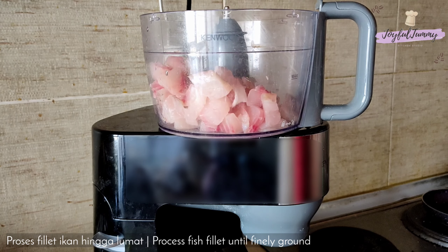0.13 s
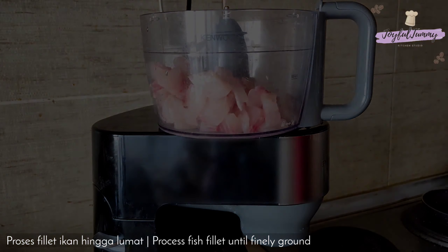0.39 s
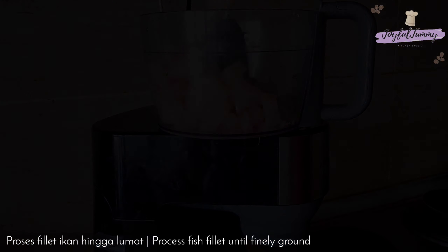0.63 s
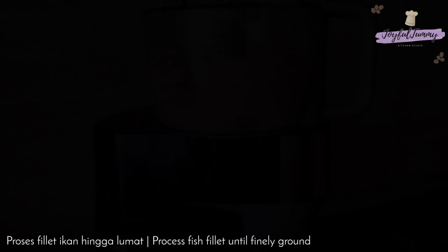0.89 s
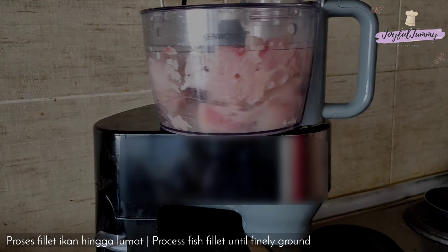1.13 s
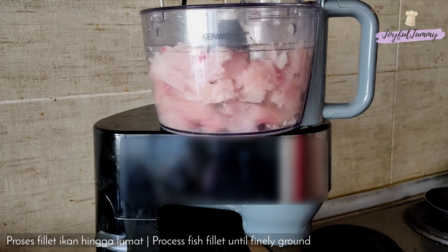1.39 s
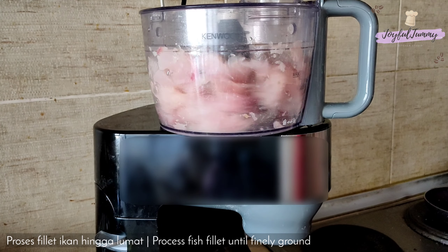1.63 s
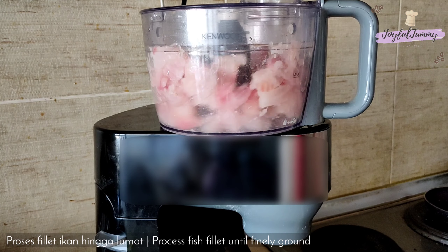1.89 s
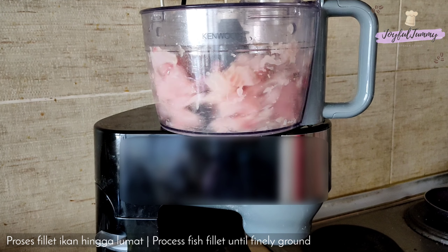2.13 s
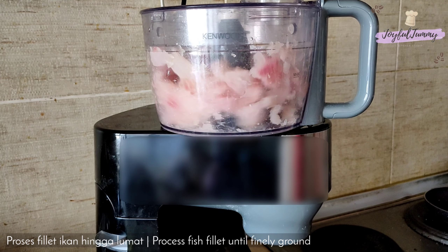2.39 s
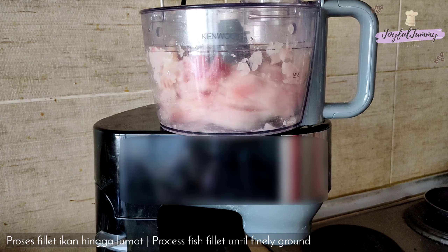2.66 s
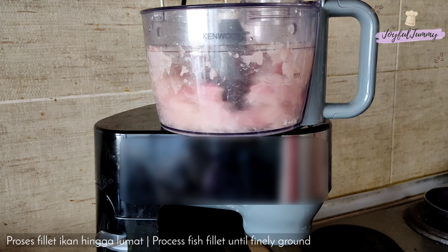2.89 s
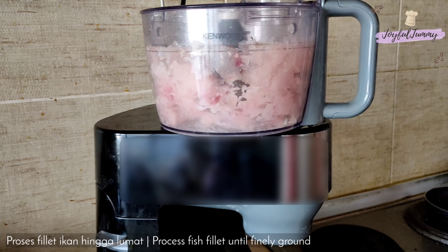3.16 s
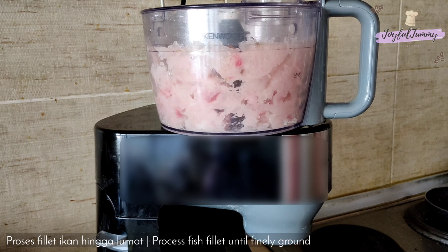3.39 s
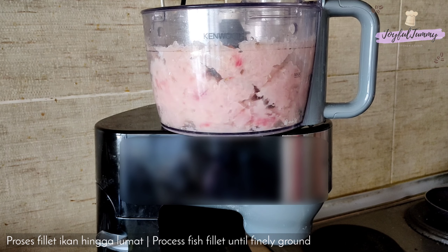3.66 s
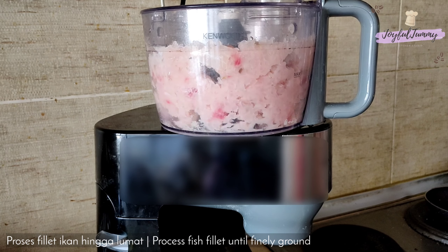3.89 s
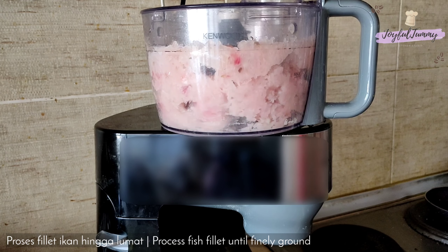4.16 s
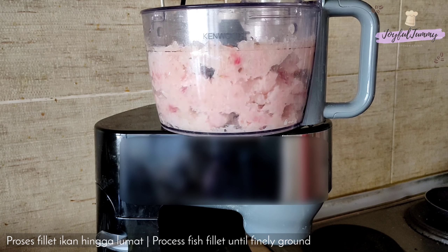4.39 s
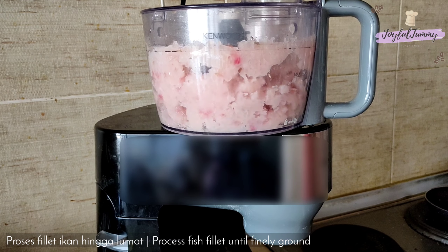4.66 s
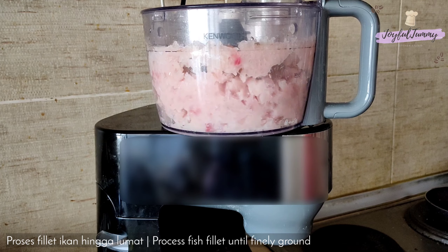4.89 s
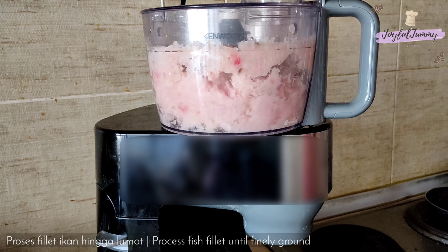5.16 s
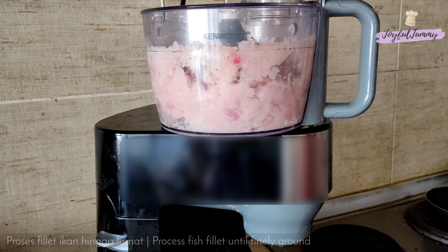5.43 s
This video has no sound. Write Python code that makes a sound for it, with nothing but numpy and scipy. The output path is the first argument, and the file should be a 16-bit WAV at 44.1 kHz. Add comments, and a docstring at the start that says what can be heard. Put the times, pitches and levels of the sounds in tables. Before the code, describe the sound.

A quiet kitchen opens with low murmur and a faint appliance hum. A hard plastic part gives a bright clack at 0.24 s, a duller one at 0.44, then fainter ticks near 0.55, 0.73 and 0.81, with tiny bright rustles, all fading to silence by 0.94 s. From about 1.0 s a food processor fades in, reaching full loudness near 1.8 s. Wet chunks slap the plastic bowl irregularly, densest and heaviest from 2.0 to 3.2 s, ringing hollowly around 700 to 1100 Hz. Between 3.3 and 4.2 s the thumps thin out and churning grows smoother; stronger slaps return from 4.25 s. Beneath are rumble and short booms near 245 Hz; above, scraping, fluttering hiss and a flickering whine climbing from about 2950 to 3300 Hz, easing slightly at the end. Short room reverberation, wide stereo treble, centred bass. The machine is still running when it ends at 5.5 s.

```python
"""A food processor fades in and runs: its blade slaps wet chunks against a plastic bowl, which rings.
Its base rumbles and booms, the motor hisses through its vents and its commutator whines.
Before it, in a quiet kitchen, a hard part is knocked a few times while the sound fades out.
Noise and short contacts ring through resonances; the whine and other motor tones are sine waves.
Two spaced microphones hear the bass alike and the treble differently."""
import sys
import numpy as np
from scipy import signal
from scipy.fft import rfft, irfft, next_fast_len
from scipy.io import wavfile
from scipy.ndimage import uniform_filter1d, map_coordinates

SR = 44100
rng = np.random.default_rng(int(sys.argv[2]) if len(sys.argv) > 2 else 0)


def gain_from_db(level_db):
    """Turn a decibel level (scalar or array-like) into a linear amplitude factor."""
    decades = np.asarray(level_db, float) / 20
    return 10 ** decades


def inscribe(sig):
    """Save sig as 16-bit PCM at rate SR to the path in sys.argv[1].

    A 1-D sig is mono; a 2-D sig holds one channel per row.
    Samples are clipped to [-1, 1] before scaling.
    """
    pcm = np.round(np.clip(np.atleast_2d(sig).T, -1, 1) * 32767)
    wavfile.write(sys.argv[1], SR, pcm.astype(np.int16))


N = 244314  # length in samples


def unit(x):
    """Scales a sound to rms 1."""
    return x / np.sqrt(np.mean(x ** 2) + 1e-20)


def along(points, hz):
    """Reads a curve of (f/Hz, value) points on a log frequency axis."""
    f, v = np.transpose(points)
    return np.interp(np.log(hz + 1), np.log(f + 1), v)


def curves(rows):
    """Gives one value per sample for each column after the time."""
    s, *cols = np.transpose(rows)
    return [np.interp(np.arange(N) / SR, s, c) for c in cols]


def wobble(rate):
    """A smooth random curve through `rate` random points a second."""
    knots = rng.standard_normal(int(N * rate / SR) + 4)
    return map_coordinates(knots, [np.arange(N) * rate / SR])


def highpass(x, order, hz):
    """Keeps what lies above hz; filtered forwards and backwards, so nothing is delayed."""
    return signal.sosfiltfilt(signal.butter(order, hz, "high", fs=SR, output="sos"), x)


def lowpass(x, order, hz):
    """Keeps what lies below hz, also without delay."""
    return signal.sosfiltfilt(signal.butter(order, hz, fs=SR, output="sos"), x)


def body(x, shape, modes=()):
    """A solid body as a causal filter: a broad shape plus resonant humps and gaps, in dB."""
    size = 16384
    hz = np.fft.rfftfreq(size, 1 / SR)
    db = along(shape, hz)
    for centre, width, gain_db in modes:
        db = db + gain_db / (1 + (2 * (hz - centre) / width) ** 2)
    # folding the cepstrum gives minimum phase: the body answers only after it is struck
    cepstrum = irfft(np.log(gain_from_db(db) + 1e-6), size)
    cepstrum[1:size // 2] *= 2
    cepstrum[size // 2 + 1:] = 0
    answer = irfft(np.exp(rfft(cepstrum)), size)[None, :size // 2]
    return signal.fftconvolve(x, answer, axes=1)[:, :N]


def patchy(x, patchy_db):
    """Random patches of gain, some hundred Hz wide and tens of ms long."""
    z = signal.stft(x, nperseg=512)[2]
    field = uniform_filter1d(rng.standard_normal(z.shape[1:]), 4, 0)
    field = uniform_filter1d(field, 6, 1)
    return signal.istft(z * gain_from_db(patchy_db * unit(field)), nperseg=512)[1][:, :N]


# how alike left and right are: f/Hz, likeness (0-1)
LIKENESS = [(30, .7), (80, .94), (200, .97), (400, .92), (700, .78), (1200, .56), (1600, .33), (2100, .42),
            (2900, .35), (3700, .06), (4650, .1), (5000, .52), (5650, .08), (6030, .46), (6400, .2),
            (6720, .4), (7400, .24), (8400, .08), (9300, .22), (10300, .05), (14800, .03)]
# how much louder the left is than the right: f/Hz, level/dB
LEFT_LEAN = [(60, -0.5), (500, -0.1), (2600, 0.4), (6200, 3.5), (8300, -8), (10000, 4.5), (11500, 13),
             (13500, 28.5), (15000, 16)]
# how far the left microphone leads the right: f/Hz, phase/radians
LEFT_LEAD = [(0, 0), (3010, -0.2), (3450, -3.2), (4220, -7.4), (4480, -6.5), (4740, -4.9), (5170, -6.4),
             (6030, -6.5), (6720, -8.4), (7410, -11.6), (7750, -8.8), (9390, -6.3), (9990, -0.2),
             (11700, -0.8), (14000, -13.2), (15000, -12.6)]


def microphones(pair):
    """Two unrelated streams mixed to the likeness, lead and lean of the spaced microphones."""
    m = next_fast_len(N + SR // 4)
    hz = np.fft.rfftfreq(m, 1 / SR)
    turn = np.arccos(np.clip(along(LIKENESS, hz), -1, 1)) / 2
    shared, apart = rfft(pair, m) * [np.cos(turn), np.sin(turn)]
    # half of the lean and lead goes to each side
    lean = gain_from_db(along(LEFT_LEAN, hz) / 2) * np.exp(.5j * along(LEFT_LEAD, hz))
    return irfft(np.array([(shared + apart) * lean, (shared - apart) / lean]), m)[:, :N]


# how long the kitchen rings: f/Hz, time to fall by 60 dB (t60/s)
ROOM_DECAY = [(300, 0.4), (2000, 0.49), (7000, 0.37), (14000, 0.52)]


def kitchen(x):
    """Each frequency of the room's answer dies at its own speed, differently at each microphone."""
    hz, t, z = signal.stft(rng.standard_normal((2, SR // 2)), SR, nperseg=256)
    decay = gain_from_db(-60 * t / along(ROOM_DECAY, hz)[:, None])
    tail = signal.istft(z * decay, SR, nperseg=256)[1]
    return signal.fftconvolve(x, tail / np.linalg.norm(tail[0]), axes=1)[:, :x.shape[1]]


def through_room(x):
    """The machine heard through the room, its tail redrawn every third of a second so no fixed colour builds up."""
    hop = SR // 3
    out = np.zeros((2, N + 4 * hop))
    window = np.sin(np.pi * np.arange(2 * hop) / (2 * hop)) ** 2  # overlapping pieces add up evenly
    for i in range(2 * hop, N, hop):
        piece = x[:, i:i + 2 * hop]
        piece = np.pad(piece * window[:piece.shape[1]], ((0, 0), (0, 2 * hop)))
        out[:, i:i + piece.shape[1]] += kitchen(piece)
    return out[:, :N]


# kitchen murmur fading out: t/s, level/dB
MURMUR_LEVEL = [(0.0, -65), (0.4, -65.5), (0.62, -75), (0.7, -75.5), (0.93, -99)]
# broad shape of the murmur: f/Hz, level/dB
MURMUR_SHAPE = [(30, -21), (74, -13), (167, -15), (200, -9), (250, -16), (297, -9.5), (428, -21),
                (1200, -23), (1450, -50), (2200, -49), (3000, -51), (9000, -49), (15000, -64)]


def murmur():
    """Low room noise, most alike in the bass, with a faint appliance hum as two narrow humps."""
    hum = [(296.0, 14, 8.0), (199, 9, 3.7)]  # f/Hz, width/Hz, level/dB
    noise = body(rng.standard_normal((2, N)), MURMUR_SHAPE, hum)
    return gain_from_db(curves(MURMUR_LEVEL)[0]) * unit(microphones(noise))


# faint bright rustles: t/s, starting level/dB, centre f/Hz, width/Hz, t60/s
RUSTLES = [(.035, -80, 7600, 900, 0.23), (0.101, -71, 5500, 2580, 0.3), (.47, -82, 9900, 1500, 0.43),
           (.505, -80, 13300, 2000, 0.23), (.725, -91, 13200, 2000, .15)]


def rustles():
    """Short bands of bright noise that die away as in a room."""
    out = np.zeros((2, N))
    t = np.arange(SR // 2) / SR
    for s, db, hz, width, t60 in RUSTLES:
        shape = [(hz - width, -60), (hz - width / 2, 0), (hz + width / 2, 0), (hz + width, -40)]
        band = body(rng.standard_normal((2, len(t))), shape)[:, :len(t)]
        out[:, round(s * SR):][:, :len(t)] += unit(band) * gain_from_db(db - 60 * t / t60)
    return out


# knocks: t/s, level/dB, then how strong each part is, level/dB: low ring, second ring, third ring,
# upper ring, brightness, room; last, contact/ms
KNOCK_LIST = [(.235, -36.5, 1, -2, -3, 2, 5.5, -1, 0.063), (.444, -48, -1, 2, -6, -6, -11, -1, 0.16),
              (.54, -58, 3, 4, -3, -2, 3, 1, 0.076), (.572, -66, -6, 12, -4, -6, 4, -4, 0.14),
              (0.734, -53.5, -1, 4, -2, 6, -12, -7.5, 0.12), (.809, -62.5, -9, 6, -2, -4, -7, -12, 0.12)]
# resonances of the knocked part: f/Hz, width/Hz, level/dB
PART_MODES = [(719, 69, 23), (1452, 130, 13.5), (1626, 60, 0), (2354, 150, 20.5), (2848, 90, 7),
              (3130, 190, 12.5), (3270, 87, 13), (3590, 110, 2), (4330, 200, 15.5), (4740, 340, -14),
              (5480, 270, 2), (6510, 330, 17), (7200, 230, 11), (8100, 330, 9)]
# the part lies differently each time: its resonances shift (share of pitch) and change strength (dB)
SHIFT, SCATTER_DB = .004, 2


def knocks():
    """A blow and a thin rattle ring the same part; longer contact is duller; each meets the room anew."""
    out = np.zeros((2, N + SR))
    t = np.arange(SR // 2) / SR
    rattle_swell = gain_from_db(-60 * t / 0.068) * (1 - np.exp(-t / 0.0015))
    thin = signal.butter(1, 900, "high", fs=SR, output="sos")
    for s, db, low_db, second_db, third_db, upper_db, bright_db, room_db, contact_ms in KNOCK_LIST:
        rattle = signal.sosfilt(thin, 0.55 * rng.standard_normal((2, len(t))) * rattle_swell)
        u = 1000 * t / contact_ms
        blow = 0.78 * u * np.exp(1 - u)  # one push, strongest after contact_ms
        tilt = [(300, -44), (600, 6 + low_db), (1460, second_db), (2350, third_db), (3300, upper_db),
                (5000, bright_db), (8500, bright_db - 7.5), (15000, 1.5 * bright_db - 20)]
        changes = rng.standard_normal((len(PART_MODES), 2))
        modes = [(hz * (1 + SHIFT * a), width, gain_db + SCATTER_DB * b)
                 for (hz, width, gain_db), (a, b) in zip(PART_MODES, changes)]
        hit = body(blow + rattle, tilt, modes)[:, :len(t)]
        hit = hit / np.sqrt(np.sum(hit ** 2))
        with_room = hit + gain_from_db(room_db) * kitchen(hit)
        out[:, round(s * SR):][:, :len(t)] += gain_from_db(db + 25.5) * with_room  # a hit of energy 1 peaks low
    return out[:, :N]


# motor speed, as the pitch of the commutator whine: t/s, f/Hz
WHINE_PITCH = [(1.05, 2950), (1.27, 2945), (1.35, 2990), (1.52, 3020), (1.58, 2990), (1.7, 3015),
               (1.9, 2945), (2.05, 3055), (2.15, 3008), (2.28, 3015), (2.45, 3080), (2.9, 3115),
               (3.17, 3102), (3.45, 3143), (3.57, 3105), (3.85, 3188), (3.98, 3138), (4.1, 3148),
               (4.6, 3295), (4.75, 3295), (4.9, 3263), (5.08, 3265), (5.17, 3222), (5.33, 3250),
               (5.54, 3260)]
LOADED_HZ = 3000  # whine pitch at the loaded speed
BARS = 24  # commutator bars: the armature turns once for this many cycles of the whine


def faster_pct():
    """Motor speed above the loaded speed, in percent."""
    return 100 * (curves(WHINE_PITCH)[0] / LOADED_HZ - 1)


def throb():
    """A swing of -1 to 1, once for each turn of the armature."""
    return np.sin(2 * np.pi * np.cumsum(curves(WHINE_PITCH)[0] / BARS) / SR)


# a tone at six times the armature's turning rate: level over the bowl, more for each percent of speed
SING_ORDER, SING_DB, SING_DB_PER_PCT = 6, -21, 1.06


def sing(level_db):
    """A narrow wavering tone tied to the armature's turning, stronger as the motor runs freer."""
    hz = curves(WHINE_PITCH)[0] * SING_ORDER / BARS + 9 * wobble(40)
    phase = 2 * np.pi * np.cumsum(hz) / SR + [[0], [.4]]  # right side a little ahead
    steady_db = uniform_filter1d(level_db, SR // 8)
    tone_db = steady_db + SING_DB + SING_DB_PER_PCT * faster_pct() + 4.9 * wobble(7)
    return gain_from_db(tone_db) * np.sin(phase)


# level of the whine over the bowl: t/s, level/dB
WHINE_OVER_BOWL = [(1.1, -6), (1.265, -13), (1.285, -3), (1.34, -9), (1.43, -4), (1.46, -14), (1.5, -13),
                   (1.7, -14.5), (2.05, -8), (2.35, -9), (2.6, -10.5), (2.75, -11), (3.15, -8), (3.3, -12),
                   (3.75, -11.5), (4.03, -7.5), (4.2, -16), (4.45, -5), (4.85, -9), (5.05, -7), (5.3, -10),
                   (5.38, -14), (5.54, -18)]


def whine(level_db):
    """The commutator's thin, unsteady tone follows the motor speed and flickers in and out of the noise."""
    hz = curves(WHINE_PITCH)[0] + 6 * wobble(30)
    phase = 2 * np.pi * np.cumsum(hz) / SR + [[0], [.8]]  # right side a little ahead
    steady_db = uniform_filter1d(level_db, SR // 8)
    return gain_from_db(steady_db + curves(WHINE_OVER_BOWL)[0] + 1.6 * wobble(20)) * np.sin(phase)


# motor housing, broad shape: f/Hz, level/dB
HOUSING_SHAPE = [(1200, -32), (2500, -29.5), (3500, -4), (4500, -15.5), (6000, -2.5), (7500, -3.5),
                 (8600, -18), (10000, -16.5), (11000, -25), (13300, -27.5), (14500, -32), (15500, -36)]
# housing resonances and gaps: f/Hz, width/Hz, level/dB
HOUSING_RINGS = [(2960, 74, 13), (4510, 360, -33), (4980, 260, 7.5), (5597, 190, -18.5), (5780, 420, 2),
                 (7250, 200, -5), (7230, 270, 3.5), (8800, 350, -0.5), (10300, 190, -7.5), (12450, 250, -6)]
# level over the bowl (dB) at the loaded speed, and more for each percent of speed above it
HISS_DB, HISS_DB_PER_PCT = -2.5, 0.22
# depth (dB) of the load's random lurches and of the throb at each armature turn
HISS_LURCH_DB, HISS_THROB_DB = 0.9, 0.93


def hiss(level_db):
    """Brush and fan noise, fluttering and throbbing, shaped by the motor housing."""
    flutter_db = HISS_LURCH_DB * wobble(12) + 1.2 * wobble(120) + HISS_THROB_DB * throb()
    air = patchy(rng.standard_normal((2, N)), patchy_db=2.0)
    housed = body(gain_from_db(flutter_db) * air, HOUSING_SHAPE, HOUSING_RINGS)
    return gain_from_db(level_db + HISS_DB + HISS_DB_PER_PCT * faster_pct()) * unit(housed)


# the base booms at its own pitch when the load jolts it: t/s of the peak, rms level/dB, f/Hz, length/s
BOOM_LIST = [(1.055, -64, 250, .02), (1.113, -58, 245, 0.03), (1.163, -50, 245.4, 0.032),
             (1.326, -39, 250.5, 0.022), (1.563, -42.5, 229, 0.029), (1.694, -39, 247.6, 0.037),
             (1.868, -33, 244.5, 0.031), (2.023, -40, 238.8, 0.028), (2.237, -43, 239.6, 0.021),
             (2.348, -31.5, 240, 0.018), (2.434, -32, 257, 0.038), (2.5, -41, 258, 0.05),
             (2.647, -35, 240.4, 0.056), (2.788, -28, 240.7, 0.021), (2.946, -44, 240, 0.05),
             (3.293, -38, 259.4, 0.035), (3.836, -38, 242.5, 0.028), (4.178, -35, 255, 0.035),
             (4.23, -34, 248, 0.038), (4.676, -43, 250, 0.061), (4.837, -32.5, 253.4, 0.037),
             (5.008, -36, 245, 0.04), (5.404, -33, 235.7, 0.058)]


def booms():
    """Short swells of the base's own low tone, alike at both microphones."""
    t = np.arange(N) / SR
    out = np.zeros(N)
    for (s, db, hz, length), phase in zip(BOOM_LIST, 2 * np.pi * rng.random(len(BOOM_LIST))):
        i = slice(round((s - 2 * length) * SR), round((s + 2 * length) * SR))
        swell = np.exp(-2 * ((t[i] - s) / length) ** 2)
        out[i] += np.sqrt(2) * gain_from_db(db) * swell * np.sin(2 * np.pi * hz * t[i] + phase)
    return out


# big chunks thrown at the bowl wall: t/s, level/dB, strongest ring f/Hz
CHUNK_LIST = [(1.094, -47, 748), (1.114, -31, 1150), (1.295, -31, 800), (1.325, -29, 735),
              (1.404, -23.5, 744), (1.474, -27, 1100), (1.516, -25, 680), (1.561, -21, 1180),
              (1.717, -20, 720), (1.798, -20, 560), (1.93, -25, 630), (1.989, -13.5, 1060),
              (2.093, -23, 791), (2.161, -16.5, 697), (2.211, -20.5, 590), (2.269, -18, 730),
              (2.3, -13.5, 714), (2.404, -22, 716), (2.447, -18.5, 634), (2.487, -18, 626),
              (2.562, -15, 1140), (2.647, -12.5, 1180), (2.755, -16, 1190), (2.831, -16.5, 1090),
              (2.929, -15, 690), (3.017, -19, 730), (3.107, -23, 780), (3.203, -18, 1080),
              (3.261, -37, 643), (3.409, -24, 708), (3.584, -32, 745), (3.636, -40, 770), (3.916, -24, 794),
              (4.206, -27, 795), (4.253, -16, 676), (4.327, -23, 716), (4.572, -17.5, 1150),
              (4.726, -18, 1960), (4.973, -21.5, 1120), (5.17, -17, 790), (5.222, -21, 633),
              (5.25, -20.5, 1490), (5.369, -24, 726), (5.479, -13.5, 2100)]
# bowl and base, broad shape: f/Hz, level/dB
BOWL_SHAPE = [(30, -37), (85, -29), (100, -13), (150, -19.5), (240, -5.5), (500, -14), (620, -4.5),
              (800, -2.5), (1120, -5.5), (1710, -13.5), (3120, -15), (4690, -27), (5000, -30),
              (6500, -58.5)]
# bowl resonances and gaps between them: f/Hz, width/Hz, level/dB
BOWL_RINGS = [(97.3, 6, 3.5), (162, 37, 5.5), (248, 46, 4), (422, 15.4, 7), (476.6, 34, 6), (525, 19, -4),
              (676, 410, 1.5), (809, 15, 5.5), (900, 370, -10.5), (1114, 48, 5.5), (1360, 49, 2),
              (1933, 190, 3), (2140, 270, 3)]
CHUNK_RISE_S, CHUNK_T60_S, CHUNK_CREST_DB = 0.0017, 0.081, 8.5
CHUNK_RING_DB, CHUNK_RING_Q = 10.5, 7.1  # extra ring where the chunk lands


def chunks():
    """A chunk lands as a short burst of contacts; where it lands decides which part of the bowl rings most."""
    t = np.arange(SR // 10) / SR
    out = np.zeros((2, N + SR))
    swell = gain_from_db(-60 * t / CHUNK_T60_S) * (1 - np.exp(-t / CHUNK_RISE_S))
    swell = swell / swell.max()
    for s, db, hz in CHUNK_LIST:
        modes = BOWL_RINGS + [(hz, hz / CHUNK_RING_Q, CHUNK_RING_DB)]
        roughness = gain_from_db(0.27 * rng.standard_normal(len(t)))
        contacts = rng.standard_normal((2, len(t))) * roughness * swell
        gain = np.linalg.norm(body(signal.unit_impulse((1, SR // 4)), BOWL_SHAPE, modes))
        padded = np.pad(contacts, ((0, 0), (0, len(t))))  # time to ring on
        rung = body(padded, BOWL_SHAPE, modes)[:, :2 * len(t)]
        out[:, round(s * SR):][:, :2 * len(t)] += gain_from_db(db - CHUNK_CREST_DB) * rung / gain
    return out[:, :N]


# small lumps meet the blade at random: how many a second, t60/s, mean size beside a churning of 1
LUMPS_PER_S, LUMP_T60_S, LUMP_GAIN = 50, .03, .45


def lumps():
    """A gain that jumps with every small lump and dies back."""
    t = np.arange(SR // 10) / SR
    sizes = rng.exponential(LUMP_GAIN, N).clip(0, 2.5 * LUMP_GAIN)
    hits = (rng.random(N) < LUMPS_PER_S / SR) * sizes
    swell = gain_from_db(-60 * t / LUMP_T60_S) * (1 - np.exp(-t / .001))
    return 1 + signal.fftconvolve(hits, swell)[:N]


# level of the deep rumble over the bowl: t/s, level/dB
RUMBLE_OVER_BOWL = [(1.0, -14), (1.3, -9.5), (1.5, -14), (1.75, -12), (2.0, -11.5), (2.3, -12.5),
                    (2.6, -13.5), (2.95, -13), (3.3, -15), (3.6, -12.5), (4.0, -12), (4.25, -8), (4.6, -13),
                    (5.0, -11), (5.54, -12)]
# level of the low drone over the bowl: t/s, level/dB
DRONE_OVER_BOWL = [(1, -10), (1.2, -4.5), (1.5, -5), (1.9, -5.5), (2.6, -3.5), (3.0, -2.5), (3.4, -2),
                   (3.8, -5), (4.2, -3.5), (4.5, -4), (4.8, -2), (5.54, -6)]
# blade scrape: level over the bowl (dB) at the loaded speed, more for each percent of speed, rough bite
BLADE_DB, BLADE_DB_PER_PCT, BITE_DB = -4, 0.4428, 1.77
# the load lurches at random (depth in dB); the bowl dips and swells with each armature turn (dB)
BOWL_LURCH_DB, BASE_LURCH_DB, BLADE_LURCH_DB, BOWL_THROB_DB = 0.5, 0.4, 0.92, -0.4


def chopping(level_db):
    """Small slaps on wet churning ring the bowl in clumps; the base rumbles below, the blade scrapes above."""
    clumps = gain_from_db(0.87 * wobble(30)) * lumps()
    sizes = gain_from_db(3.5 * rng.exponential(1, N).clip(0, 2))
    slaps = (rng.random(N) < .04) * sizes * rng.standard_normal((2, N))
    churn = patchy(rng.standard_normal((2, N)), patchy_db=1.0)
    rung = body(clumps * (churn + 0.61 * unit(slaps)), BOWL_SHAPE, BOWL_RINGS)
    # split by pitch: rumble, drone, bowl, blade
    deep = lowpass(rung, 3, 190)
    base = lowpass(rung, 3, 430) - deep
    blade = highpass(rung, 3, 1650)
    bowl = rung - deep - base - blade
    deep_db = curves(RUMBLE_OVER_BOWL)[0] + BASE_LURCH_DB * wobble(12)
    base_db = curves(DRONE_OVER_BOWL)[0] + BASE_LURCH_DB * wobble(21)
    bowl_db = BOWL_LURCH_DB * wobble(14) + BOWL_THROB_DB * throb()
    blade_db = BLADE_DB + BLADE_DB_PER_PCT * faster_pct()
    blade_db = blade_db + BLADE_LURCH_DB * wobble(14) + BITE_DB * wobble(190)
    layers = [(deep_db, deep), (base_db, base), (bowl_db, bowl), (blade_db, blade)]
    return gain_from_db(level_db) * sum(gain_from_db(db) * unit(x) for db, x in layers)


# level of the churning bowl, fade-in included: t/s, level/dB
BOWL_LEVEL = [(0.99, -102), (1.01, -77), (1.09, -59.5), (1.125, -48.5), (1.17, -48.5), (1.3, -44),
              (1.42, -39), (1.8, -33.5), (2.35, -34), (2.5, -32.5), (2.8, -33.5), (2.9, -36.5),
              (2.95, -36.5), (3.26, -37.5), (3.55, -39.5), (4.15, -36), (4.3, -35.5), (4.9, -35),
              (5.07, -35), (5.2, -33.5), (5.35, -35.5), (5.54, -34)]


def scene():
    """The quiet part ends in silence; the machine starts after it, partly heard through the room."""
    t = np.arange(N) / SR
    level_db, = curves(BOWL_LEVEL)
    direct = chopping(level_db) + chunks() + hiss(level_db)
    machine = microphones(gain_from_db(-0.5) * direct + gain_from_db(-8.5) * through_room(direct))
    machine = machine + booms() + whine(level_db) + sing(level_db)
    fade_out = np.clip((.94 - t) / 0.079, 0, 1)
    quiet = (knocks() + rustles() + murmur()) * fade_out
    return quiet + machine * (t > BOWL_LEVEL[0][0])


def roll_off(x):
    """The treble ends steeply here."""
    return signal.sosfilt(signal.butter(12, 15440, fs=SR, output="sos"), x)


def record(dry):
    """Cuts everything from 15500 Hz up and returns the finished sound."""
    m = next_fast_len(N + SR // 4)
    keep = np.fft.rfftfreq(m, 1 / SR) < 15500
    mix = irfft(rfft(dry, m) * keep, m)[:, :N]
    return roll_off(mix)


dry = scene()
out = record(dry)
inscribe(out)
```